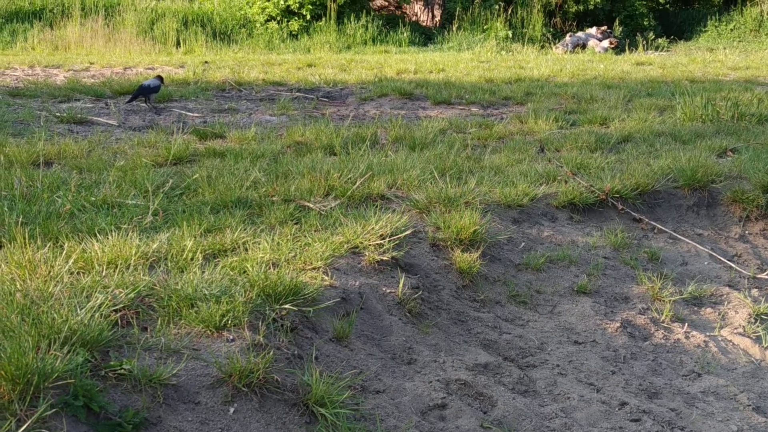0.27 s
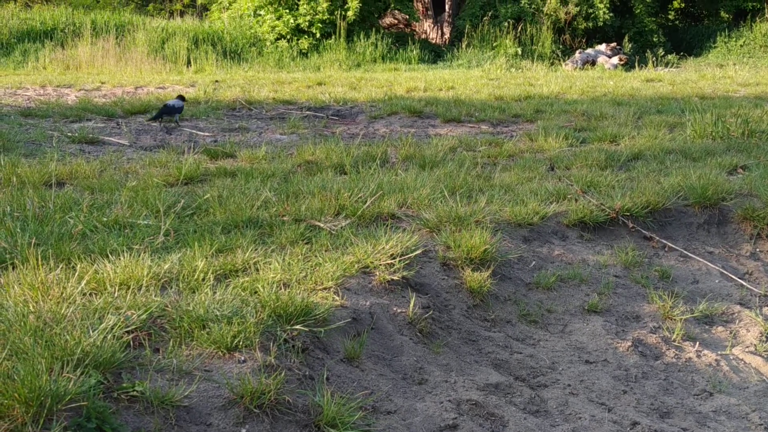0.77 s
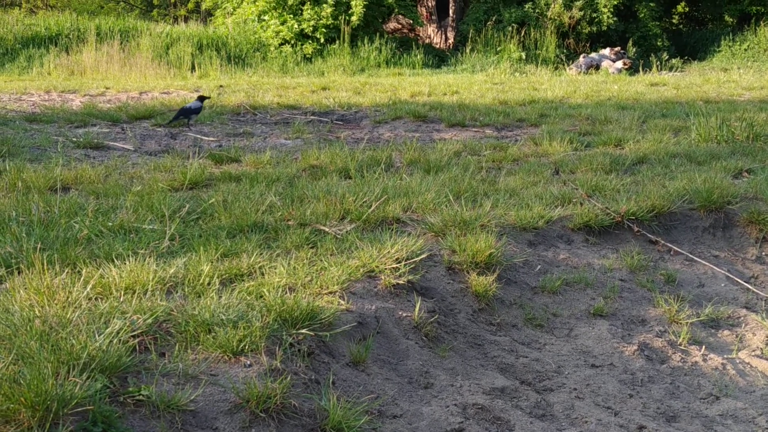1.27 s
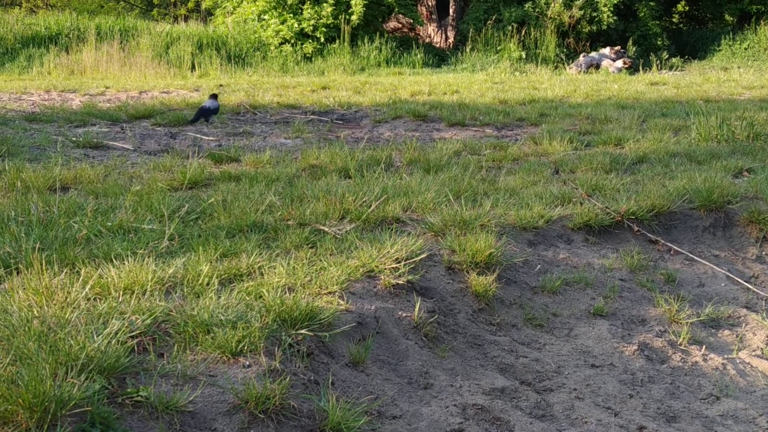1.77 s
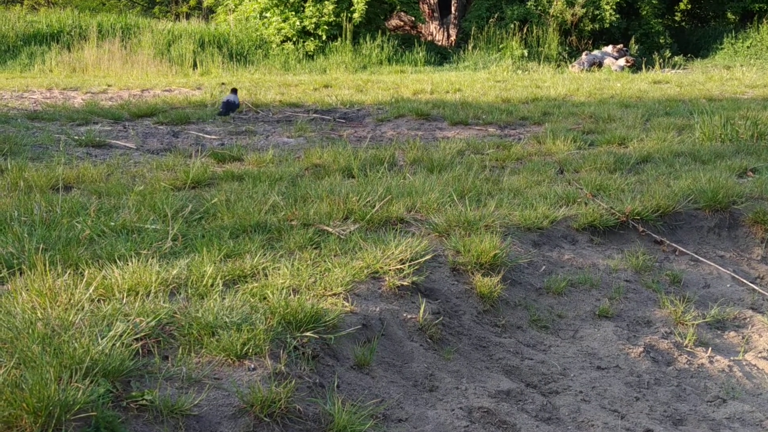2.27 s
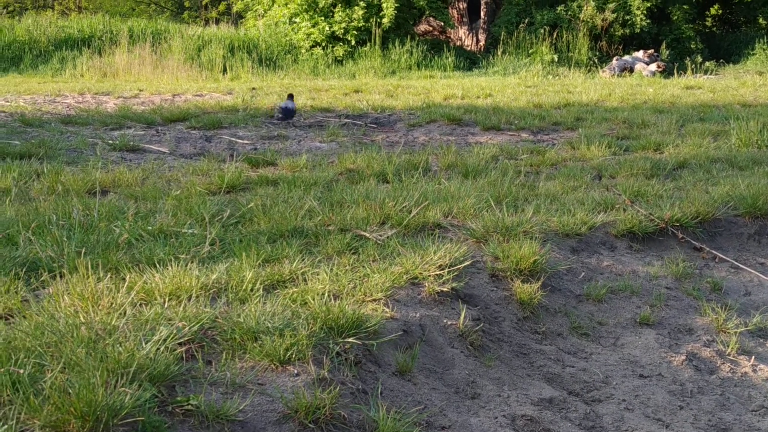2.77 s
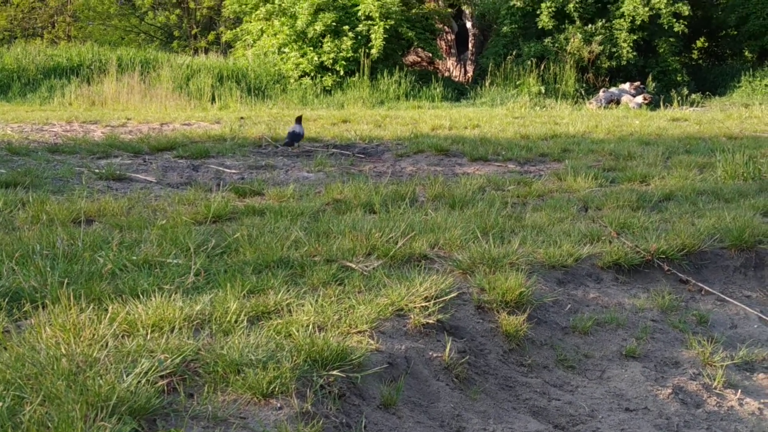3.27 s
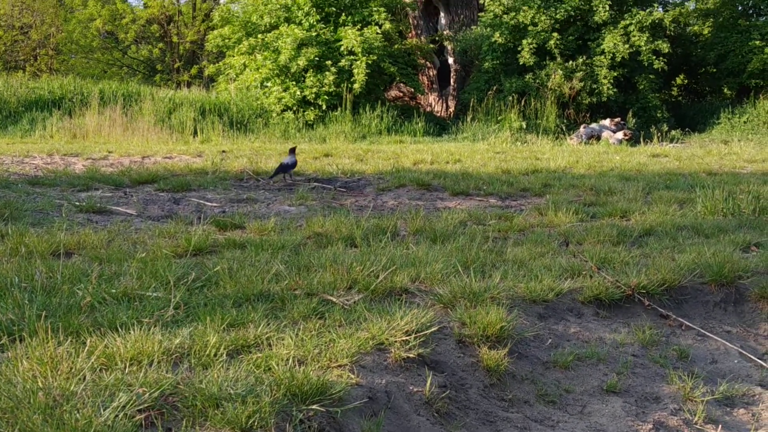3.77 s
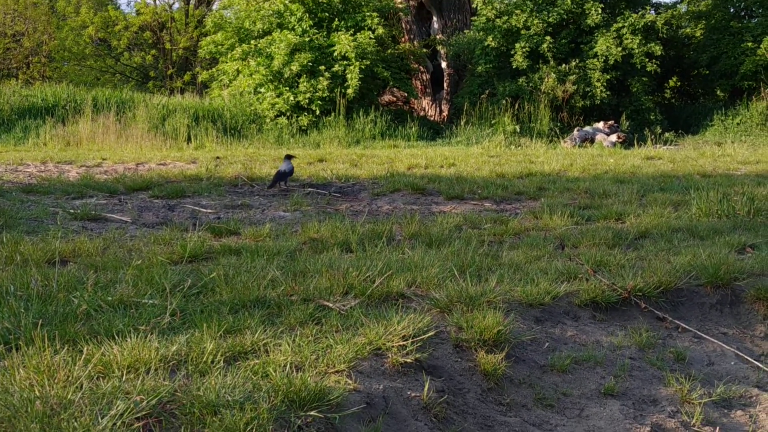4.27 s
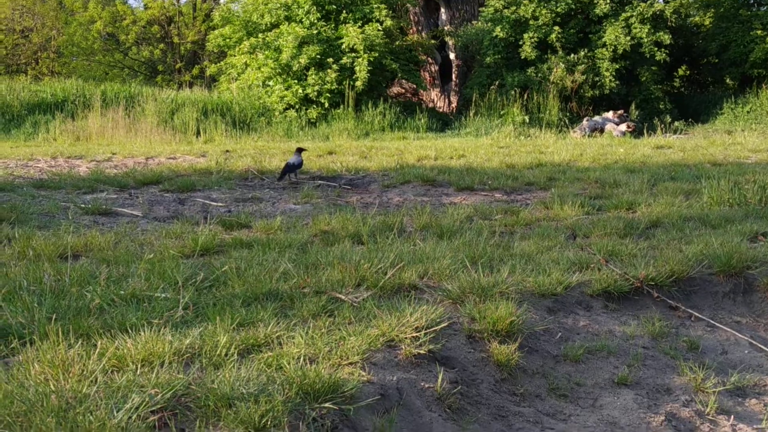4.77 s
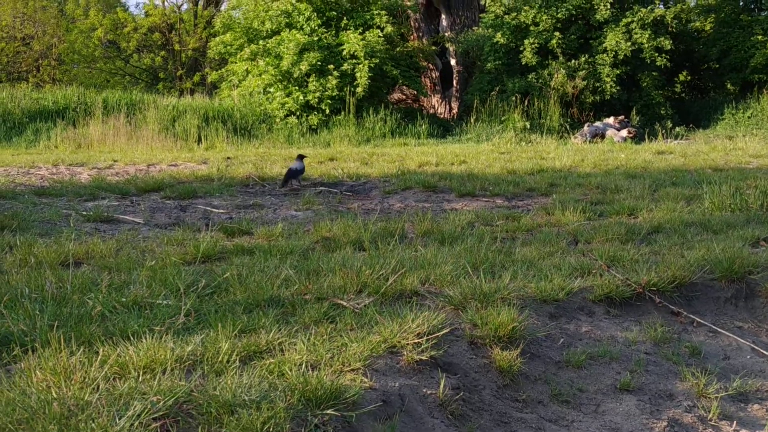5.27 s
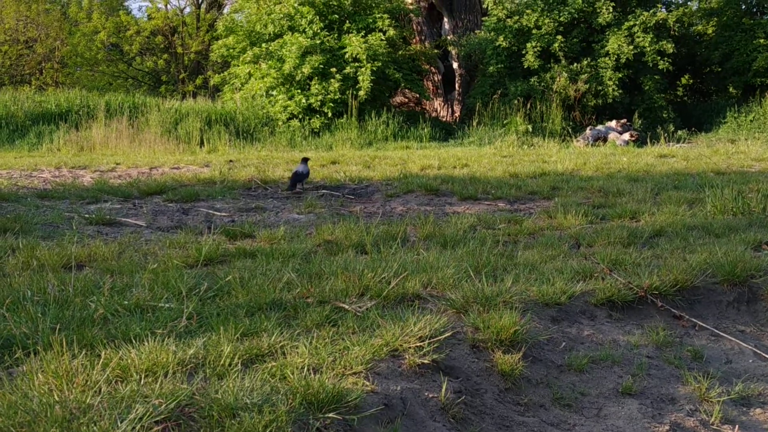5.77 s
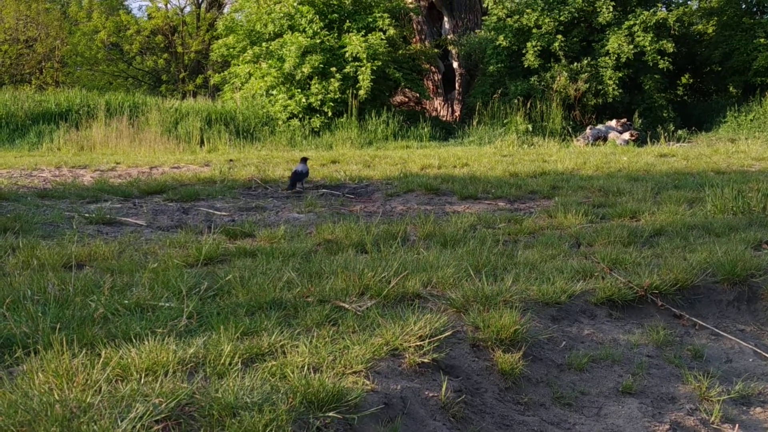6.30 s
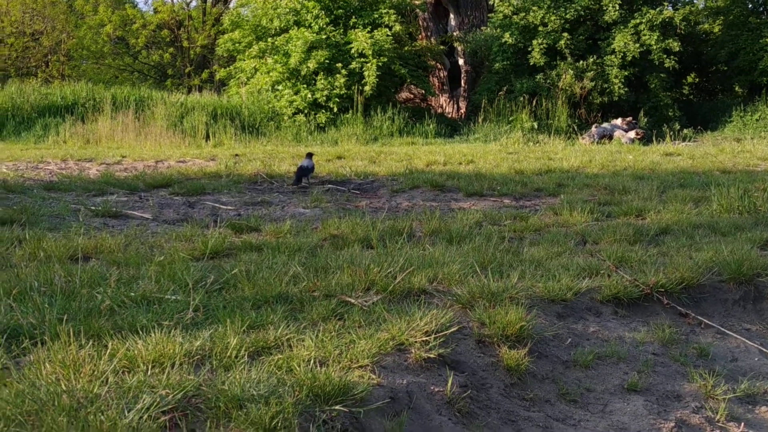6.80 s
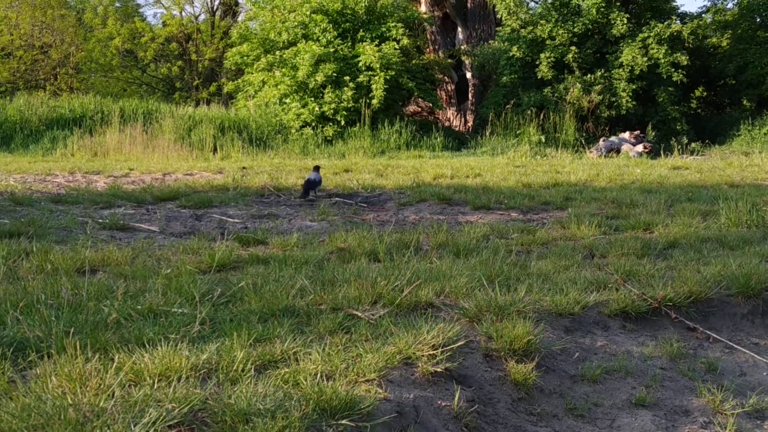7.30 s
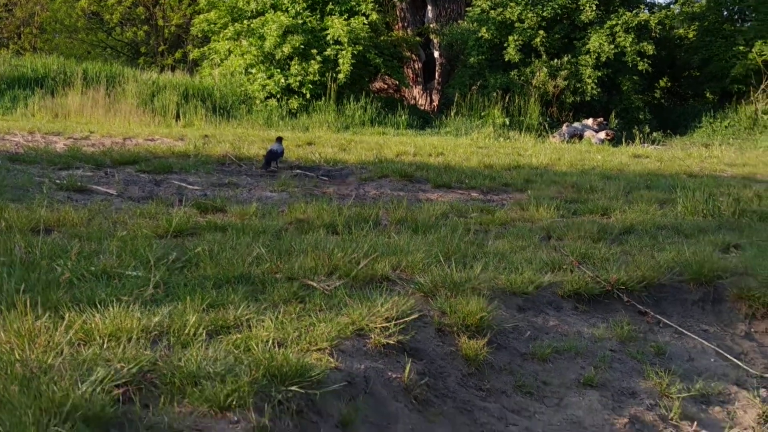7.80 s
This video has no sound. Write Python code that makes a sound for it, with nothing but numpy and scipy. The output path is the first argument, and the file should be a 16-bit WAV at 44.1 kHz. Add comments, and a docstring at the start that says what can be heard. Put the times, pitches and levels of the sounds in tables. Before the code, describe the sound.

A calm grassy riverbank: soft rumble and hiss, small birds whistling short gliding notes with faint echoes off trees, and fainter twitter beyond. Birdsong grows livelier after four seconds. A distant crow caws hoarsely near 5.6 and 6.8 seconds. The hand-held stereo recorder is regripped: light rubs early, a knock at 3.1, then loud finger scrapes and clicks in the last second and a half, mostly left.

```python
"""Small birds whistle and trill in the trees of a quiet grassy riverbank: gliding sines, some broken into beats.
Fainter sweeps twitter further off, and a distant crow caws twice, a hoarse voice tightening into croaks.
Shaped noise makes the far rumble, the river and the hiss; a noise tail echoes the birds off the trees.
The hand-held recorder with its two microphone ports is gripped anew now and then: noise strokes for
fingers rubbing mostly by the left port and for the palm, struck modes for case clicks, low thumps."""
import sys
import numpy as np
from scipy import signal
from scipy.fft import rfft, irfft, next_fast_len
from scipy.io import wavfile
from scipy.ndimage import uniform_filter1d

SR = 44100
rng = np.random.default_rng(int(sys.argv[2]) if len(sys.argv) > 2 else 0)


def wav_out(sig):
    """Save sig, one row per channel (or a flat mono array), as 16-bit PCM at SR to the path in sys.argv[1]."""
    wavfile.write(sys.argv[1], SR, np.round(np.clip(np.atleast_2d(sig).T, -1, 1) * 32767).astype(np.int16))


N = 354740   # samples
PORT_LAG_S = 0.00044   # sound travel time between the two ports


def from_db(db):
    """Gain of a level in dB."""
    return 10 ** (np.asarray(db) / 20)


def rms_one(x):
    """Scale to rms 1."""
    return x / np.sqrt(np.mean(x ** 2) + 1e-20)


def at_hz(points, hz):
    """Read a spectrum on a log-frequency axis."""
    points = np.array(points)
    return np.interp(np.log(hz), np.log(points[:, 0]), points[:, 1])


def colour(x, spectrum):
    """Give flat noise a spectrum; rms 1."""
    size = next_fast_len(N)
    hz = np.maximum(np.arange(size // 2 + 1) * SR / size, 1)
    shaped = rfft(x, size) * from_db(at_hz(spectrum, hz))
    return rms_one(irfft(shaped, size)[..., :N])


def band_pass(x, order, edges_hz):
    """Keep what lies between two frequencies."""
    return signal.sosfilt(signal.butter(order, edges_hz, "band", fs=SR, output="sos"), x)


def high_pass(x, order, edge_hz):
    """Keep what lies above a frequency."""
    return signal.sosfilt(signal.butter(order, edge_hz, "high", fs=SR, output="sos"), x)


def pan(db):
    """Left and right gains whose mean is 1, from left over right in dB."""
    ratio = from_db(db)
    return np.array([2 * ratio / (1 + ratio), 2 / (1 + ratio)])


def drift(rate):
    """Slow chance with rms 1: noise low-passed twice at a rate in Hz, drawn every 40 samples."""
    r = np.exp(-80 * np.pi * rate / SR)
    white = rng.standard_normal(N // 40 + 2002)
    slow = signal.lfilter([1], [1, -2 * r, r * r], white)[2000:]
    return np.interp(np.arange(N) / 40, np.arange(len(slow)), rms_one(slow))


def swell(start, attack, hold, release, edge_db):
    """The samples of an attack-hold-release shape, and its level in dB at each."""
    s = start + np.cumsum([-attack, attack, hold, release])
    at = np.arange(round(s[0] * SR), min(round(s[-1] * SR), N))
    return at, np.interp(at / SR, s, [edge_db, 0, 0, edge_db])


# The open air of the riverbank. Each row: frequency in Hz, relative level in dB per Hz.
AIR_SPECTRUM = [(18, -76), (30, -41), (103, -24), (199, 1.5), (461, -11), (866, -12.5), (1810, -16.5),
                (2540, -16), (3060, -18), (4530, -17), (7470, -20.5), (14800, -22), (16000, -25.5)]
# How alike the air is at both ports. Each row: frequency in Hz, likeness from -1 (opposite) to 1 (same).
AIR_LIKENESS = [(60, 0.24), (150, 1), (380, 0.54), (950, -0.31), (2380, -0.082), (5980, -0.058),
                (15000, 0.018)]
AIR_DB = -54


def air(patchy_db=.8, left_db=.6):
    """Far rumble, river and hiss in half-octave bands, each with its own slow flicker and likeness."""
    out, together = 0, drift(1.5)
    edges_hz = 25 * 2 ** np.arange(0, 9.6, .5)
    white = rng.standard_normal((2, 2, N))
    for k, (low, high) in enumerate(zip(edges_hz, edges_hz[1:])):
        mid, side = band_pass(white[k % 2], 2, [low, high])
        alike = np.clip(at_hz(AIR_LIKENESS, np.sqrt(low * high)), -1, 1)
        gain = from_db(patchy_db * (0.55 * together + drift(15.4)))
        out = out + gain * (np.sqrt(1 + alike) * mid + np.sqrt(1 - alike) * side * [[1], [-1]])
    return from_db(AIR_DB) * colour(out, AIR_SPECTRUM) * from_db([[left_db], [-left_db]])


# Whistled notes of the near birds. Each row: start in seconds, length in seconds, start pitch in Hz,
# middle pitch in Hz, end pitch in Hz, level before flutter and pan in dB, left over right in dB.
BIRD_NOTES = [(0.0, 0.036, 1980, 1945, 1830, -56, 9), (0.414, 0.066, 1660, 1716, 1650, -59, 11),
              (0.49, 0.14, 1640, 1590, 1480, -65.5, 10), (0.433, 0.063, 1900, 1950, 1950, -63, 7.5),
              (0.508, 0.093, 1945, 1990, 1980, -61.5, 9.5), (0.675, 0.072, 3900, 3650, 3950, -65.5, -11),
              (0.7, 0.1, 2170, 2090, 1810, -56.5, 19), (0.764, 0.093, 2070, 2060, 1970, -57, 8),
              (0.799, 0.14, 1770, 1687, 1690, -53, 8), (0.922, 0.03, 1700, 1880, 1790, -57, 7.5),
              (1, 0.11, 3260, 2620, 2250, -62.5, 9), (1.001, 0.049, 3700, 3640, 3640, -64, 1.5),
              (1.073, 0.039, 4500, 4540, 4450, -57.5, 1), (1.344, 0.055, 4470, 4480, 4520, -58, -16),
              (1.665, 0.045, 4050, 3870, 3630, -57.5, 1), (1.677, 0.025, 6870, 4900, 3800, -58, 9),
              (1.701, 0.06, 3690, 3540, 3830, -59, 1.5), (1.75, 0.028, 3640, 3570, 3440, -63, 1),
              (1.757, 0.027, 3980, 5140, 3850, -61, -11), (1.902, 0.028, 2900, 2910, 2750, -62, 2),
              (1.958, 0.15, 2280, 2270, 2260, -69, 7.5), (2.01, 0.025, 6900, 5300, 4400, -61, -9),
              (2.024, 0.079, 4460, 4470, 4570, -62.5, -8), (2.325, 0.043, 4550, 4250, 4160, -57, 6),
              (2.7, 0.083, 4760, 4500, 4720, -60, -6), (2.753, 0.05, 3590, 3450, 3430, -55, 4.5),
              (2.946, 0.11, 2600, 2900, 2760, -55.5, 5.5), (3.176, 0.038, 4900, 3920, 3480, -52, 0.5),
              (3.311, 0.062, 4450, 4500, 4350, -57.5, 0.5), (3.367, 0.14, 4260, 4320, 4400, -63, -4),
              (3.605, 0.079, 2064, 2620, 3160, -58.5, 2), (3.863, 0.071, 2510, 2630, 2650, -58.5, 7.5),
              (4.153, 0.064, 2290, 2664, 2640, -55, 1.5), (4.31, 0.039, 4900, 4510, 4200, -57, 1),
              (4.347, 0.048, 3420, 3430, 3340, -52, 3), (4.41, 0.037, 3140, 3080, 3050, -53.5, 4),
              (4.586, 0.076, 2893, 2880, 2470, -49, 2.5), (4.775, 0.074, 3920, 4100, 4110, -46, 1.5),
              (4.836, 0.046, 3950, 3740, 3480, -51.5, 1.5), (4.972, 0.13, 2990, 2976, 3205, -50.5, 8),
              (5.13, 0.29, 1750, 1885, 1733, -65.5, 10), (5.197, 0.018, 4300, 4380, 4280, -48, 2),
              (5.216, 0.02, 4210, 3940, 3700, -42.5, 1), (5.325, 0.049, 4480, 4330, 4230, -51, 1.5),
              (5.365, 0.021, 4250, 4050, 3970, -49.5, 1), (5.448, 0.066, 2530, 2640, 2540, -57.5, 7),
              (5.493, 0.034, 4090, 4020, 3590, -46, 1.5), (5.535, 0.035, 5950, 5650, 5150, -62, -14),
              (5.522, 0.069, 3530, 3245, 3220, -49.5, 5), (5.557, 0.087, 2380, 2165, 2090, -58.5, 15),
              (5.695, 0.045, 2830, 3020, 2880, -46, 1.5), (5.78, 0.05, 6250, 6330, 5850, -60, -10),
              (5.843, 0.071, 3400, 3226, 3250, -47.5, 2), (5.888, 0.031, 3260, 3800, 3930, -47, 1.5),
              (5.995, 0.014, 4340, 4370, 4320, -41, 3), (6.123, 0.064, 3260, 3020, 2780, -49, 5.5),
              (6.262, 0.046, 2710, 2700, 2610, -56, 9), (6.399, 0.05, 4165, 3930, 3924, -43.5, 6.5),
              (6.42, 0.031, 6170, 6030, 5140, -57, -1), (6.35, 0.039, 3190, 3160, 3130, -57, 1.5),
              (6.525, 0.03, 3270, 3280, 3210, -52, 8.5), (6.53, 0.2, 2350, 2354, 2430, -58, 7.5),
              (6.55, 0.037, 3670, 3340, 3180, -48.5, 5), (6.659, 0.033, 2950, 2730, 2660, -55, 1.5)]


def songbirds(flutter_db=2.2):
    """Near sines gliding through three pitches; moving air makes them flutter."""
    out, waver = np.zeros((2, N)), drift(64)
    for s, length, start_hz, middle_hz, end_hz, level_db, pan_db in BIRD_NOTES:
        at = np.arange(round(s * SR), round((s + length) * SR))
        part = np.linspace(0, 1, len(at))
        glide_hz = np.interp(part, [0, .5, 1], [start_hz, middle_hz, end_hz])
        hz = uniform_filter1d(glide_hz, len(at) // 4, mode="nearest")   # round the bend
        hz = hz * (1 + .008 * waver[at])
        # a bird on the left reaches that port first: its phase leads there
        lead_s = PORT_LAG_S * np.clip(pan_db / 10, 0, 1) * np.array([[1], [0]])
        whistle = np.sin(2 * np.pi * (np.cumsum(hz) / SR + hz * lead_s))
        tone = np.sin(np.pi * part) ** 0.14 * whistle
        out[:, at] += from_db(level_db) * tone * pan(pan_db)[:, None]
    return out * from_db(flutter_db * drift(69))


def twitter(count=110, level_db=-72, spread_db=3.0):
    """Faint quick sweeps of many small birds further off, at random moments, pitches and sides."""
    out = np.zeros((2, N))
    for when, pitch, span, sweep, strength, side in rng.random((count, 6)):
        part = np.linspace(0, 1, round((.02 + .04 * span) * SR))
        hz = (3300 + 2500 * pitch) * (1 + (.1 - .3 * sweep) * part)
        tone = np.sin(np.pi * part) * np.sin(2 * np.pi * np.cumsum(hz) / SR)
        at = int(when * (N - len(part)))
        gain = from_db(level_db + 2 * spread_db * strength)
        out[:, at:at + len(part)] += gain * tone * pan(20 * side - 10)[:, None]
    return out


# Rattling trills. Each row: start in seconds, length in seconds, start pitch in Hz, end pitch in Hz,
# deepest dip in Hz, beats per second, level before beating and pan in dB, left over right in dB.
BIRD_TRILLS = [(0.131, 0.28, 2970, 2930, 304, 54, -62, 10), (1.065, 0.33, 2554, 2585, 560, 38, -62, 24)]


def trills():
    """A rough whistle whose pitch dips with each beat, deeper as the trill goes on."""
    out, wander = np.zeros((2, N)), drift(95)
    uneven = .2 * drift(20)   # beats come unevenly
    for s, length, start_hz, end_hz, dip_hz, per_s, level_db, pan_db in BIRD_TRILLS:
        at = np.arange(round(s * SR), round((s + length) * SR))
        part = np.linspace(0, 1, len(at))
        dip = np.sin(np.pi * (part * length * per_s + uneven[at])) ** 2
        hz = start_hz + (end_hz - start_hz) * part - dip_hz * np.sqrt(part) * dip + 100 * wander[at]
        # the voice is strongest at the top and at the bottom of each beat
        loudness = np.sin(np.pi * part) ** 0.24 * (0.37 + (2 * dip - 1) ** 2)
        tone = loudness * np.sin(2 * np.pi * np.cumsum(hz) / SR)
        out[:, at] += from_db(level_db) * tone * pan(pan_db)[:, None]
    return out


ECHO_DB, ECHO_T60_S = -6.5, .5


def trees(x):
    """Scattered echoes off trunks and leaves: a dying noise tail, own in each channel."""
    t = np.arange(SR // 2) / SR
    tail = rng.standard_normal((2, len(t))) * from_db(-60 * t / ECHO_T60_S) * (t > .008)
    tail /= np.sqrt(np.sum(tail ** 2, axis=1, keepdims=True))
    return from_db(ECHO_DB) * signal.fftconvolve(x, tail, axes=1)[:, :N]


# Low thumps. Each row: start in seconds, level in dB, pitch in Hz.
LOW_THUMPS = [(0.36, -44.5, 172), (0.66, -48, 127)]


def thumps(length=0.02):
    """Soft low pushes, brief windowed sines alike at both ports."""
    out, part = np.zeros(N), np.linspace(0, 1, round(length * SR))
    for s, level_db, hz in LOW_THUMPS:
        push = np.sin(np.pi * part) ** 2 * np.sin(2 * np.pi * hz * length * part)
        out[round(s * SR):][:len(part)] += from_db(level_db) * push
    return out


def grains(per_s, spread_db):
    """Dense tiny skin slips of uneven size, own ones at each port."""
    uneven = from_db(spread_db * np.minimum(rng.exponential(1, (2, N)), 5))
    sizes = uneven * rng.standard_normal((2, N))
    return sizes * (rng.random((2, N)) < per_s / SR)


# Finger strokes over the case. Each row: full pressure from in seconds, attack, hold and release in seconds,
# then nominal levels in dB: hiss left, hiss right, rasp left, rasp right.
FINGER_STROKES = [(2.226, 0.15, 0.025, 0.25, -48, -59, -55.5, -57),
                  (2.667, 0.042, 0.043, 0.043, -49.5, -52.5, -77, -77),
                  (3.101, 0.018, 0.085, 0.0087, -64, -50, -53, -42),
                  (3.426, .025, 0.02, .025, -73, -76, -60, -49),
                  (4.257, 0.26, .005, 0.049, -58, -60, -56, -54),
                  (4.623, 0.12, 0.063, 0.087, -46.5, -71, -51, -50),
                  (4.884, 0.011, 0.035, 0.022, -36, -57, -45, -45.5),
                  (6.65, .06, 0.0027, 0.024, -50.5, -73, -51, -54),
                  (6.813, 0.044, 0.21, 0.012, -42, -75, -41.5, -48.5),
                  (6.851, 0.014, 0.0089, 0.0045, -27, -70, -47, -46),
                  (7, .006, 0.017, 0.006, -33, -73, -47, -58),
                  (7.044, 0.034, 0.038, 0.14, -49, -73, -51.5, -54),
                  (7.16, 0.047, 0.048, .02, -43.5, -73, -54, -54),
                  (7.225, 0.024, 0.049, 0.063, -18.5, -62, -25, -50),
                  (7.262, 0.066, 0.0027, 0.029, -10, -58, -37, -45),
                  (7.309, 0.048, 0.02, 0.098, -27.5, -73, -39, -56),
                  (7.377, .02, 0.017, 0.017, -42, -73, -66, -69),
                  (7.658, 0.19, 0.053, 0.03, -49.5, -73, -56.5, -50.5),
                  (7.769, 0.097, 0.035, 0.014, -28, -67, -33, -45)]
# Hiss of a light and of a firm finger, and rasp carried by the case.
# Each row: frequency in Hz, relative level in dB per Hz.
LIGHT_HISS_SPECTRUM = [(2500, -16.5), (6000, -10), (8500, -4.5), (10000, -3), (13800, 4), (16500, -11)]
FIRM_HISS_SPECTRUM = [(2500, -46), (5000, -13.5), (7500, -4.5), (9700, -0.5), (13000, -3.5), (16500, -23)]
RASP_SPECTRUM = [(120, -32), (220, 3), (400, 5), (900, -1), (2000, 1), (4000, 1), (6500, -2.5), (9000, -11)]
FIRM_FROM_DB, FIRM_TO_DB = -28, -11   # hiss levels between which the finger turns from light to firm
THIN_RASP_HZ = 860   # low cut of the rasp under a light finger
STROKE_EDGE_DB = -20   # level of the swell at the outer ends of attack and release
RUB_UNEVEN_DB = 1.0   # the finger drags in jerks


def rubs():
    """Skin sliding by a port hisses, the case carries a duller rasp; both turn lower when pressed firmly."""
    slips = grains(24000, spread_db=1.0)
    light, firm = colour(slips, LIGHT_HISS_SPECTRUM), colour(slips, FIRM_HISS_SPECTRUM)
    rasp = colour(grains(16000, spread_db=1.2), RASP_SPECTRUM)
    thin_rasp = rms_one(high_pass(rasp, 2, THIN_RASP_HZ))
    power = np.full((4, N), 1e-20)   # strokes that overlap add in power
    for s, attack, hold, release, *levels_db in FINGER_STROKES:
        at, shape_db = swell(s, attack, hold, release, STROKE_EDGE_DB)
        taper = 1 - from_db(STROKE_EDGE_DB - shape_db)   # to silence at the outer ends
        power[:, at] += from_db(np.add.outer(levels_db, shape_db)) ** 2 * taper
    hiss_gain, rasp_gain = np.sqrt(power).reshape(2, 2, N) * from_db(RUB_UNEVEN_DB * drift(34))
    hiss_db = 20 * np.log10(hiss_gain)
    press = np.clip((hiss_db - FIRM_FROM_DB) / (FIRM_TO_DB - FIRM_FROM_DB), 0, 1)
    grip = np.clip(press + 0.47, 0, 1)
    hiss = hiss_gain * ((1 - press) * light + press * firm)
    return hiss + rasp_gain * ((1 - grip) * thin_rasp + grip * rasp)


def ring(strikes, hz, t60):
    """A unit strike sets a dying sine of starting height 1 ringing."""
    r, w = from_db(-60 / (t60 * SR)), 2 * np.pi * hz / SR
    return signal.lfilter([0, np.sin(w)], [1, -2 * r * np.cos(w), r * r], strikes + 1e-18)


# Clicks of the case. Each row: time in seconds, strike level in dB, left over right in dB, centre pitch in Hz.
CASE_CLICKS = [(2.572, -33.5, 11, 11500), (2.823, -45, 18, 9000), (3.120, -23.5, 28, 11000),
               (3.124, -17, 15.5, 308), (3.127, -26, 10, 500), (6.4945, -32, -27, 6950),
               (6.7523, -26, -17.5, 2730), (6.8295, -27.5, 18, 5500), (6.842, -22.5, -16, 2420),
               (6.877, -33, -10, 1820), (7.504, -42, -8, 2980), (7.781, -35, -12, 1000),
               (7.925, -30, -8, 700), (7.9727, -20.5, 27, 11200)]
# Modes of the case. Each row: frequency in Hz, relative level in dB, time to die by 60 dB in seconds.
CASE_MODES = [(373, -8, 0.014), (756, -5, 0.0063), (1800, 2.5, 0.0028), (3900, 8, 0.0017),
              (5400, 4.5, 0.00097), (6220, -3.5, 0.0063), (8560, 2, 0.0016), (11200, -1, 0.0045),
              (14300, 3, 0.002)]


def clicks(octaves=1.65, spread_db=2.5):
    """Each click strikes the modes of the case near its centre pitch, with new strengths at each port."""
    s, strike_db, pan_db, centre_hz = np.transpose(CASE_CLICKS)
    at, out = np.round(s * SR).astype(int), np.zeros((2, N))
    chance = rng.standard_normal((len(s), len(CASE_MODES), 2))
    for k, (hz, mode_db, t60) in enumerate(CASE_MODES):
        near = np.exp(-(np.log2(hz / centre_hz) / octaves) ** 2 / 2)
        strength = from_db(strike_db + mode_db + spread_db * chance[:, k].T)
        # high modes flex the ports against each other
        flex = [[1], [np.sign(600 - hz)]]
        strikes = np.zeros((2, N))
        strikes[:, at] = strength * near * pan(pan_db) * flex
        out += ring(strikes, hz, t60) * (-1) ** k
    return out


# Caws of the distant crow. Each row: full voice from in seconds, length of full voice in seconds,
# opening pitch before the scoop in Hz, level before the beak's filter in dB.
CROW_CAWS = [(5.604, 0.483, 353.8, -47), (6.786, 0.49, 353.4, -47)]
CAW_ATTACK_S, CAW_RELEASE_S, CAW_EDGE_DB = 0.03, 0.016, -12
CAW_TIGHTENS_FROM, CAW_TIGHT_AT = .56, .74   # shares of the caw
CAW_SCOOP_HZ, CAW_SCOOP_S = 14, .05   # the voice starts flat and slides up
CAW_CREEP_HZ_PER_S = 6
THROAT_OPEN_HZ, THROAT_TIGHT_HZ = 1800, 2100   # the resonance climbs as the open voice fades
THROAT_OPEN_WIDTH_HZ, THROAT_TIGHT_WIDTH_HZ = 470, 200
OPEN_RATTLE_PER_S, OPEN_FADES_DB, CAW_RASP_DB = 44.5, -6, -8
CROAK_PER_S, CROAK_BEAT_S = 35, .372   # one croak is centred that long after the start
CROAK_HZ = 311   # fundamental once the throat is tight
CROAK_UPPER_DB, CROAK_SWELL_DB = -9, 6


def crow(swing=0.11, croak_swing=.2, half_db=-7, pan_db=2.0):
    """A hoarse voice rattles in pitch; as the throat tightens it breaks into croaks that each slide up."""
    out, wander = np.zeros(N), drift(122)
    uneven = .12 * drift(15)   # the rattle comes unevenly
    hoarse = signal.lfilter([.02], [1, -.98], rng.standard_normal(N))
    rasp = rms_one(band_pass(rng.standard_normal(N), 3, [1350, 2250]))
    for s, length, opening_hz, caw_db in CROW_CAWS:
        at, shape_db = swell(s, CAW_ATTACK_S, length, CAW_RELEASE_S, CAW_EDGE_DB)
        since = at / SR - s
        effort = np.interp(since, [CAW_TIGHTENS_FROM * length, CAW_TIGHT_AT * length], [0, 1])

        scoop_hz = CAW_SCOOP_HZ * np.exp((since[0] - since) / CAW_SCOOP_S)
        hz = opening_hz + CAW_CREEP_HZ_PER_S * since - scoop_hz
        throat_hz = THROAT_OPEN_HZ + (THROAT_TIGHT_HZ - THROAT_OPEN_HZ) * effort
        width_hz = THROAT_OPEN_WIDTH_HZ + (THROAT_TIGHT_WIDTH_HZ - THROAT_OPEN_WIDTH_HZ) * effort
        rattle = (since * OPEN_RATTLE_PER_S + uneven[at]) % 1
        phase = 2 * np.pi * np.cumsum(hz * (1 - swing * (rattle - .5) + .01 * wander[at])) / SR
        voice = sum(np.exp(-((k * hz - throat_hz) / width_hz) ** 2 / 2) * np.sin(k * phase)
                    for k in range(3, 8))
        # strong and weak pulses in turn put lines halfway between the harmonics
        voice = voice * (1 + 2 * from_db(half_db) * np.sin(phase / 2))
        voice = voice * (1 + 3.6 * hoarse[at]) + from_db(CAW_RASP_DB) * rasp[at]
        voice = voice * (1 - .45 * np.cos(np.pi * rattle) ** 2)
        voice = voice * from_db(OPEN_FADES_DB * since / length * effort)

        beat = ((since - CROAK_BEAT_S) * CROAK_PER_S + .5) % 1
        croak_hz = CROAK_HZ * (1.06 - .06 * effort + croak_swing * (beat - .5) + .006 * wander[at])
        phase = 2 * np.pi * np.cumsum(croak_hz) / SR
        croaks = np.sin(5 * phase) + from_db(CROAK_UPPER_DB) * np.sin(6 * phase)
        croaks = croaks * np.sin(np.pi * beat) ** 2 * (1 + 2 * hoarse[at])
        out[at] = from_db(caw_db + shape_db) * (voice + effort * from_db(CROAK_SWELL_DB) * croaks)
    out = band_pass(out, 3, [900, 2450])   # the beak passes a narrow range
    late = np.roll(out, round(PORT_LAG_S * SR))   # the left port hears the crow later
    return np.array([late, out]) * pan(pan_db)[:, None]


# Dull scuffs of the palm on the case. Each row: full pressure from in seconds, attack, hold and release
# in seconds, level before pan in dB, left over right in dB.
PALM_SCUFFS = [(6.84, 0.0027, 0.011, 0.006, -45.5, 13), (7.001, .003, 0.01, .006, -50.5, 6),
               (7.2, 0.012, 0.013, 0.012, -41.5, 23), (7.241, 0.0064, 0.0071, 0.0097, -35.5, 32),
               (7.291, 0.0068, 0.027, 0.027, -43, 21), (7.367, 0.061, 0.032, 0.019, -52, 18),
               (7.7, 0.022, 0.11, 0.028, -46, 11)]
# Band of the scuff noise: low edge in Hz, high edge in Hz.
SCUFF_BAND_HZ = [181, 930]


def scuffs(lumpy_db=2.0):
    """Lumpy low noise under each push of the palm."""
    out = np.zeros((2, N))
    low = rms_one(band_pass(rng.standard_normal((2, N)), 2, SCUFF_BAND_HZ))
    low = low * from_db(lumpy_db * drift(62))
    for s, attack, hold, release, level_db, pan_db in PALM_SCUFFS:
        at, shape_db = swell(s, attack, hold, release, STROKE_EDGE_DB)
        out[:, at] += from_db(level_db + shape_db) * low[:, at] * pan(pan_db)[:, None]
    return out


LOW_CUT_HZ = 147   # of the rubs, scuffs and clicks
FAR_ECHO_DB, CROW_ECHO_DB = 3, -2.5   # sent to the trees, relative to the direct sound


def scene():
    """Birds with their echoes, the handling close by, the air under all."""
    near, far, caws = songbirds(), trills() + twitter(), crow()
    handling = high_pass(rubs() + scuffs() + clicks(), 4, LOW_CUT_HZ)
    echoes = trees(near + from_db(FAR_ECHO_DB) * far + from_db(CROW_ECHO_DB) * caws)
    return near + far + caws + echoes + handling + thumps() + air()


CUTOFF_HZ = 16900


def record(dry):
    """The highest peaks are rounded, the top is cut steeply."""
    rounded = np.tanh(dry / .95) * .95
    return signal.sosfilt(signal.cheby2(14, 70, CUTOFF_HZ, fs=SR, output="sos"), rounded)


dry = scene()
out = record(dry)
wav_out(out)
```